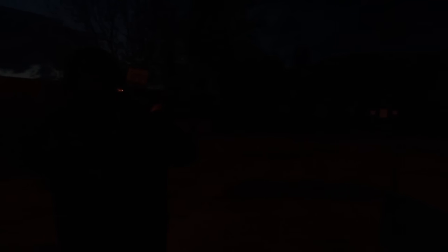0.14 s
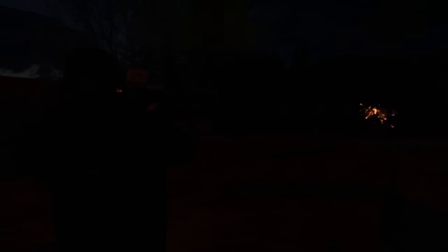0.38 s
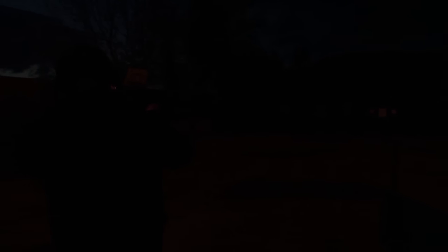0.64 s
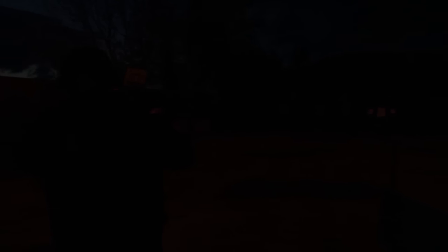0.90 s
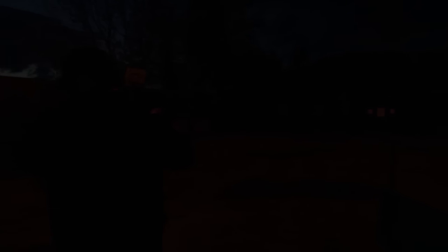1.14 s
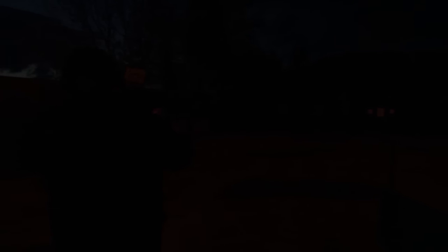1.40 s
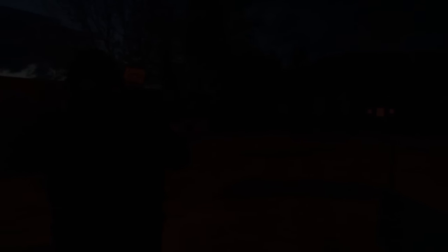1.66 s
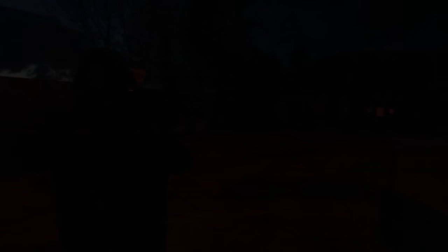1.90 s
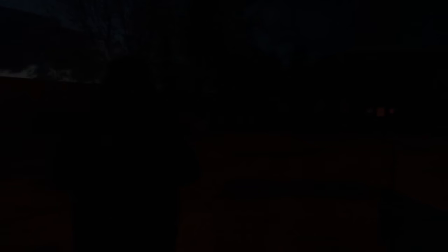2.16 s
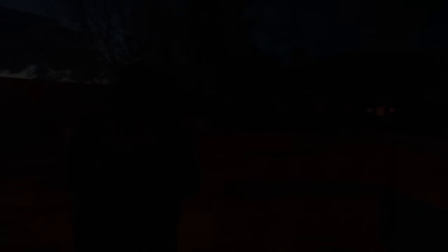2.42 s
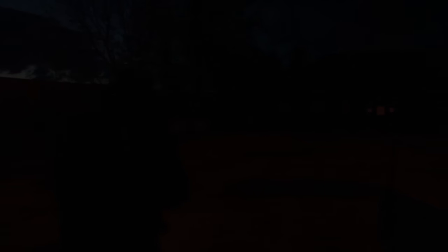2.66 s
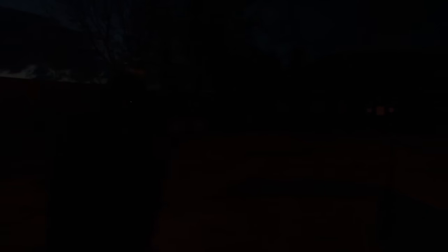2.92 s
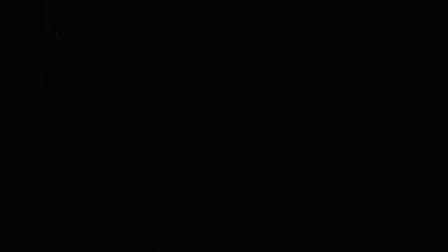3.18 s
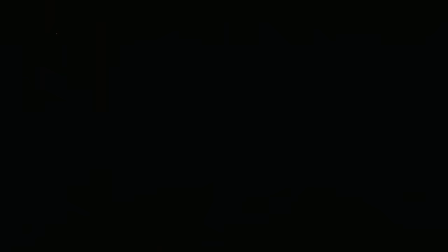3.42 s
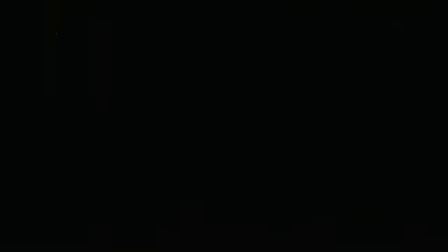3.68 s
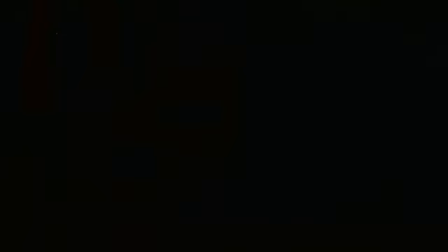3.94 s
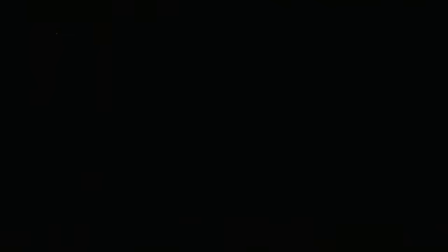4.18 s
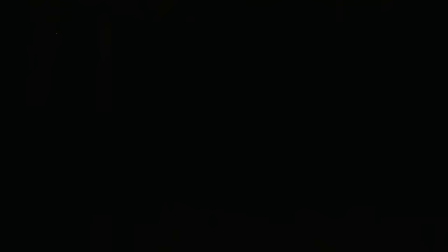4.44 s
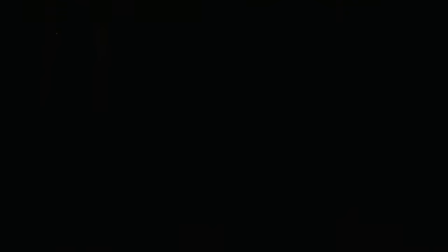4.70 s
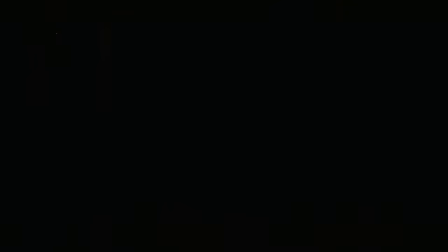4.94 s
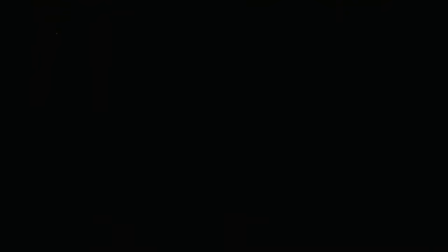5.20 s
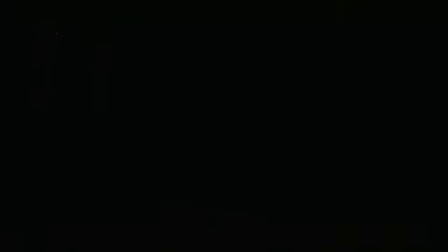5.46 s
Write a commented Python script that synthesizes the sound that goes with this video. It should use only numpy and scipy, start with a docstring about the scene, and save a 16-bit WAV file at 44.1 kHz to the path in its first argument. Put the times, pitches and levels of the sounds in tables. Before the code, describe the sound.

Two distorted rifle shots outdoors at night, each rolling back in echoes from trees and hills, with a brass case ringing and gear rattling between.

```python
"""Rifle shots on an outdoor range at night, in two joined stretches: decaying noise bursts on slow pushes
overload the microphone; shaped noise and strong slaps roll back from trees and hills, duller with travel.
Narrow noise bands resonate faintly in the roll. Brass cases click, knock the ground and ring as sines.
Gear ticks and rustles close by in noise puffs and grains, over hiss, wind rumble and a faint far hoot."""
import sys
import numpy as np
from scipy import signal
from scipy.fft import rfft, irfft, next_fast_len
from scipy.io import wavfile
from scipy.ndimage import uniform_filter1d, minimum_filter1d, map_coordinates

SR = 44100
rng = np.random.default_rng(int(sys.argv[2]) if len(sys.argv) > 2 else 0)


def gain_from_decibels(decibels):
    """Convert decibel values to linear amplitude factors."""
    exponent = np.asarray(decibels, float) / 20
    return 10 ** exponent


def to_wav(s):
    """Save 16-bit WAV."""
    ch = np.atleast_2d(s).T  # columns
    pcm = np.round(np.clip(ch, -1, 1) * 32767)  # PCM
    wavfile.write(sys.argv[1], SR, pcm.astype(np.int16))


N = 246059
T = np.arange(N) / SR
JOIN_S = 3.087  # the second stretch begins

# Steady background, one list a stretch. Each row: time in seconds, hiss in dB (10.5-14 kHz),
# rumble in dB (30-120 Hz, before its wobble).
FLOOR = [
    [(0, -68, -46), (1.2, -71.5, -41.5), (2.3, -63.5, -43), (3.085, -62, -48)],
    [(3.09, -85.5, -67), (4.3, -85, -59.5), (5.58, -77.5, -55)],
]
# Hiss spectrum. Each row: frequency in Hz, density in dB per Hz, before scaling.
HISS_SPECTRUM = [(150, 13.5), (500, 19), (1500, 7.5), (3000, 2.5), (8000, -0.5), (15000, -2)]
# Rumble spectrum. Each row: frequency in Hz, density in dB per Hz, before scaling.
RUMBLE_SPECTRUM = [(15, -19), (30, -3.5), (55, -4.5), (90, -7), (140, -11), (250, -31.5), (500, -89.5)]
# Faint far hoot. Each row: time in seconds, pitch in Hz, level in dB before its wobble.
HOOT = [(3.089, 547, -61), (3.16, 537, -61.5), (3.219, 527.7, -72), (3.37, 524, -61), (3.5, 526, -75.5),
        (3.56, 517, -87)]
# Cloth and straps, one row a movement. Each row: start in seconds, length in seconds,
# starting level in dB (6-14 kHz, before the swell), change in dB per second,
# scrape (2.3-4.7 kHz) over it in dB.
RUSTLE = [(1.43, 0.16, -50, -70, -10), (2.0, .2, -51, -1.2, 2), (2.36, .73, -58, 5.5, 1),
          (2.608, .05, -34.5, -290, -3), (2.631, 0.19, -47.5, -9.5, -2.7), (2.762, .052, -44, 120, 11.5),
          (2.968, .061, -25.5, -60, 1.5), (3.035, .05, -51, 92.5, 4.5)]
# Dry ticks of rolling brass and gear. Each row: start in seconds, level in dB before the band filter,
# centre in Hz.
TICKS = [(.272, -40.5, 7160), (1.335, -33.5, 9000), (1.923, -22, 4900), (1.939, -28, 8000),
         (2.0479, -31.5, 10100), (2.094, -26.5, 13600), (2.163, -19, 8800), (2.183, -22, 3760),
         (2.4515, -19, 2580), (2.616, -17, 10100), (2.787, -12.5, 3240), (2.807, -14, 2730),
         (2.965, -13.5, 3490), (2.971, -13.5, 9080), (2.979, -9, 5904), (2.988, -5.5, 4980),
         (3.005, -5.5, 6920), (3.076, -23, 3970), (5.005, -46.5, 11000), (5.227, -40, 8940),
         (5.552, -44.5, 7340)]
# Case contacts and ring swells; some rows are nearly all ring. Each row: time in seconds,
# click in dB before its filter, low ring in dB, high ring in dB (rings before the tumbling wobble).
CASE_SOUNDS = [(0.0, -70, -55, -55), (.1, -62, -56, -58), (1.4301, -1.5, -29.5, -21.5),
               (1.7379, -13.5, -45, -51), (1.752, -48, -42, -31), (1.866, -30.5, -53, -34.5),
               (1.959, -37, -51, -36.5), (5.079, -34, -44.5, -51), (5.572, -52, -63, -60)]
# Case rings, one list a kind of case. Each row: frequency in Hz, t60 in seconds, level changes per second.
CASE_RINGS = [
    [(9765, 0.4, 76), (14800, 0.203, 81)],
    [(10000, 0.15, 140), (14460, 0.22, 120)],
]
# Ground's knock under a case. Each row: frequency in Hz, resonance width in Hz (applied twice),
# gain in dB over the click's level.
GROUND_KNOCK = [(1500, 605, 28), (300, 340, 14)]
# Narrow resonances in the roll. Each row: start in seconds, frequency in Hz, resonance width in Hz
# (applied twice), level in dB before decay, t60 in seconds.
RESONANCES = [(.45, 2200, 119.2, -31, 2.3), (.45, 5454, 148, -32, 1.1), (4.03, 3656, 290, -18, .94),
              (4.03, 7570, 270, -25.5, 0.64)]
# Shots, the first before the start. Each row: travel counted from, in seconds, early bass lift in dB before
# its frequency weight, tilt in dB per octave, share (0-1) of the treble loss that strong reflections escape.
SHOTS = [(-1.5, 11.5, -3.5, .1), (0.45, 6, -0.56, 0.2), (4, 3.5, -3.5, .45)]
# Slopes, tree lines and hills that answer, one list a shot. Each row: loudest at in seconds,
# level in dB (0.5-2 kHz), swell in dB per second, fade in dB per second.
ANSWERS = [
    [(0.0041, -49.5, 900, 7)],
    [(.368, -29, 899, 30), (.424, -17, 898, 89.5), (.495, -20, 149.5, 62), (.52, -26.5, 198, 17),
     (.92, -27, 18.5, 39.5), (1.76, -30, 87, 32), (2.0, -38.5, 28.5, 52), (2.5, -52, 8, 4)],
    [(3.967, -3, 895.5, 69), (4.2, -17, 39.5, 58.5), (4.8, -51.5, 30, 21), (5.3, -50, 39, 21)],
]
# Single strong reflections. Each row: start in seconds, level in dB before colouring.
SLAPS = [(0.559, 1), (.657, 0.5), (0.741, 1.5), (.774, -7), (.842, -2), (.885, -2), (0.924, -4.5),
         (0.958, -3.5), (1.035, -21), (1.735, -6.5), (1.821, -30), (1.847, -14.5), (1.897, -8), (2.076, -6),
         (2.138, -13.5), (4.131, 3.5), (4.186, 7.5), (4.213, 12), (4.286, 3.5), (4.314, 1), (4.366, 2),
         (4.397, 1), (4.502, -10), (5.272, -28)]
# Colour of a fresh blast, before the shot's tilt. Each row: frequency in Hz, level in dB.
FRESH_COLOUR = [(500, -2), (1000, 0), (2000, -3), (4000, -5), (8000, -8.5), (16000, -10)]
# Loss in air. Each row: frequency in Hz, loss in dB per second of travel.
AIR_LOSS = [(1000, 6.78), (2000, 9.5), (3000, 15.8), (4000, 21.7), (5500, 31.4), (8000, 53.7), (11000, 90),
            (16000, 150)]
# Overloading bursts. Each row: start in seconds, starting level in dB, t60 in seconds, centre in Hz,
# width in Hz.
BURSTS = [(0.3649, -14.5, 0.25, 9120, 14000), (0.3716, -5, 0.12, 7660, 14000),
          (0.3694, -6, 0.036, 1094, 1500), (3.964, 8.5, 0.07, 2971, 6000), (3.981, 11, 0.29, 400, 880)]
# Slow pressure pushes: the muzzle blast's, then a long negative sag after the second shot. Each row: start in
# seconds, # signed size before shaping, time constant in seconds.
PUSHES = [(.4165, .8, .001), (.446, .6, .0015), (.494, .5, .002), (3.981, 6, .004), (4.02, -2.5, .03)]

FAINT_TICKS_PER_S, FAINT_MAX_DB = 12, -49
SWELL_SHARE, STOP_S = .25, .005  # of a movement's length; time a movement takes to stop
RIM_DELAY_S = .0015  # the rim lands after the base
SMEAR_S, SMEAR_PER_S = .0015, .0015  # tail of a strong reflection, growth per second of travel


def along(points, hz):
    """(Hz, value) points read on a log frequency axis."""
    f, v = np.transpose(points)
    return np.interp(np.log(hz + 1), np.log(f + 1), v)


def filtered(x, response):
    """x through a complex frequency response."""
    m = next_fast_len(len(x) + 8192)
    return irfft(rfft(x, m) * response(np.fft.rfftfreq(m, 1 / SR)), m)[:len(x)]


def peak(f, hz, width_hz):
    """Response of a causal resonance."""
    return 1j * f * width_hz / (hz * hz - f * f + 1j * f * width_hz)


def noise(count=N):
    """White noise, rms 1."""
    return rng.standard_normal(count)


def band_unit(x, lo_hz, hi_hz):
    """x scaled to rms 1 inside a band."""
    return x / np.std(filtered(x, lambda f: (f > lo_hz) & (f < hi_hz)))


def wobble(knots_per_s):
    """Smooth random curve through normal knots."""
    return map_coordinates(rng.standard_normal(int(N * knots_per_s / SR) + 4), [T * knots_per_s])


def gain(rows, column):
    """Gain curve of one dB column, silent outside its rows."""
    rows = np.array(rows)
    return gain_from_decibels(np.interp(T, rows[:, 0], rows[:, column], -200, -200))


def crackle(clicks_per_s, spread_db):
    """Random clicks of uneven size, rms 1."""
    signs = (rng.random(N) < clicks_per_s / SR) * rng.choice([-1, 1], N)
    x = signs * gain_from_decibels(spread_db * np.minimum(rng.exponential(size=N), 2.5))
    return x / np.std(x)


def add(track, start_s, x):
    """Lay x on the track in place."""
    part = track[round(start_s * SR):][:len(x)]
    part += x[:len(part)]


def background():
    """Microphone hiss with faint crackle, light wind rumble, and the hoot with its octave."""
    grainy = noise() + 0.23 * crackle(54, spread_db=1.5)
    hiss = band_unit(filtered(grainy, lambda f: gain_from_decibels(along(HISS_SPECTRUM, f))), 10500, 14000)
    rumble = band_unit(filtered(noise(), lambda f: gain_from_decibels(along(RUMBLE_SPECTRUM, f))), 30, 120)
    rumble = rumble * gain_from_decibels(2.5 * wobble(9))
    s, hz, _ = np.transpose(HOOT)
    phase = 2 * np.pi * np.cumsum(np.interp(T, s, hz)) / SR
    tone = np.sin(phase) + .11 * np.sin(2 * phase + 1.5 * wobble(30))
    hoot = gain(HOOT, column=2) * gain_from_decibels(4 * wobble(25)) * tone
    return hoot + sum(gain(rows, column=1) * hiss + gain(rows, column=2) * rumble for rows in FLOOR)


def rustle():
    """Cloth slips in quick separate snaps over a fine grain, with a scrape that rings near 3 kHz."""
    slips = signal.fftconvolve(np.abs(crackle(310, spread_db=-1)), np.exp(-T[:256] / 0.002))[:N]
    grains = crackle(5000, spread_db=2) + .6 * noise()
    grains = grains * (1.1 + slips / np.std(slips))
    bright = band_unit(filtered(grains, lambda f: peak(f, 8500, 11000)), 6000, 14000)
    scrape = filtered(grains, lambda f: peak(f, 2870, 2500) ** 2 + .5 * peak(f, 1000, 2000))
    scrape = band_unit(scrape, 2300, 4700)
    out = np.zeros(N)
    for s, length_s, db, db_per_s, scrape_db in RUSTLE:
        swell = (T - s) / (SWELL_SHARE * length_s)
        stop = (s + length_s - T) / STOP_S
        moving = np.clip(np.minimum(swell, stop), 0, 1) * (T < JOIN_S)
        level = gain_from_decibels(db + db_per_s * np.clip(T - s, 0, length_s))
        out += moving * level * (bright + gain_from_decibels(scrape_db) * scrape)
    return out


def ticks():
    """Short noise puffs, each around its own centre, and faint ones at random."""
    out, t = np.zeros(N), T[:1024]
    draws = rng.random((round(FAINT_TICKS_PER_S * N / SR), 3))
    faint = [(s * N / SR, FAINT_MAX_DB - 8 * a, 5000 + 7000 * b) for s, a, b in draws]
    # no faint ticks from the join until the last shot's travel count starts
    faint = [row for row in faint if not JOIN_S < row[0] < SHOTS[-1][0]]
    for s, db, hz in TICKS + faint:
        puff = noise(len(t)) * gain_from_decibels(-60 * t / .007)
        add(out, s, gain_from_decibels(db) * filtered(puff, lambda f: peak(f, hz, .7 * hz)))
    return out


def cases():
    """Rim clicks over a soft knock of the ground; tumbling brass rings decay, cut at the next row."""
    out, knocks, t = np.zeros(N), np.zeros(N), T[:SR // 2]
    ends = [row[0] for row in CASE_SOUNDS[1:]] + [N / SR]
    for (s, db, *ring_dbs), end in zip(CASE_SOUNDS, ends):
        click = noise(len(t)) * gain_from_decibels(db - 60 * t / 0.0058)
        click = filtered(click, lambda f: peak(f, 11000, 10000))
        ring = np.zeros(len(t))
        for ring_db, (hz, t60_s, changes_per_s) in zip(ring_dbs, CASE_RINGS[int(s > JOIN_S)]):
            tumble_db = 5.9 * wobble(changes_per_s)[:len(t)]
            ring += gain_from_decibels(ring_db + tumble_db - 60 * t / t60_s) * np.sin(2 * np.pi * hz * t)
        add(out, s + RIM_DELAY_S, click + ring * (t < end - s))
        add(knocks, s - .001, gain_from_decibels([db]))
    return out + filtered(knocks, lambda f: sum(gain_from_decibels(db) * peak(f, hz, width_hz) ** 2
                                                for hz, width_hz, db in GROUND_KNOCK))


def resonances():
    """Narrow resonances in the roll: noise bands that start with a shot and decay."""
    out = np.zeros(N)
    for s, hz, width_hz, db, t60_s in RESONANCES:
        t = np.clip(T - s, 0, None)
        narrow = filtered(noise(), lambda f: peak(f, hz, width_hz) ** 2)
        out += gain_from_decibels(db - 60 * t / t60_s) * (1 - np.exp(-t / .01)) * narrow / np.std(narrow)
    return out


def roll(rows):
    """Parts of the land swell and fade, powers adding, from the first answer to the stretch's end."""
    db = [level + np.minimum(swell * (T - s), fade * (s - T)) for s, level, swell, fade in rows]
    first_s = rows[0][0]
    same_stretch = (T < JOIN_S) == (first_s < JOIN_S)
    return np.sqrt(np.sum(gain_from_decibels(db) ** 2, axis=0)) * (T > first_s - .003) * same_stretch


def strong_reflections():
    """Each slap is a short 1.5 kHz wave and a noise tail that lengthens with travel time."""
    slaps, t = np.zeros(N), T[:512]
    wave = np.sin(2 * np.pi * 1500 * t) * np.exp(-t / 0.00039)
    for s, db in SLAPS:
        travel_s = s - max(row[0] for row in SHOTS if row[0] < s)
        tail = noise(len(t)) * np.exp(-t / (SMEAR_S + SMEAR_PER_S * travel_s))
        add(slaps, s, gain_from_decibels(db) * (wave / (1 + .6 * travel_s) + 0.5 * tail))
    return slaps


def echoes():
    """Countless reflections and a few strong ones, dulled by the air for their travel time."""
    slaps = strong_reflections()
    puff = noise(512) * np.exp(-T[:512] / 0.0013)
    clumps = signal.fftconvolve(crackle(140, spread_db=5), puff)[:N]
    dense = noise() + .7 * clumps / np.std(clumps)
    f, t, z = signal.stft(np.array([dense, slaps]), SR, nperseg=1024)
    band = (f > 500) & (f < 2000)
    air_db_per_s = along(AIR_LOSS, f)[:, None]
    bass_weight = along([(60, 1.5), (250, 1.23), (700, 0.045)], f)[:, None]
    out = np.zeros(N)
    for k, ((travel_from_s, bass_db, tilt_db, hard_share), rows) in enumerate(zip(SHOTS, ANSWERS)):
        travel_s = np.clip(t - travel_from_s, 0, 2.2)
        fresh_db = along(FRESH_COLOUR, f) + tilt_db * np.log2(1 + f / 1000)
        colour_db = fresh_db[:, None] - air_db_per_s * travel_s
        # trunks and leaves return little bass: it is gone once the near ground has answered
        colour_db += bass_weight * (bass_db - 17 * (1 - np.exp(-(travel_s / 0.29) ** 2)))
        colour = gain_from_decibels(colour_db)
        colour /= np.sqrt(np.mean(colour[band] ** 2, axis=0))
        # hard faces keep more treble than foliage
        shine = gain_from_decibels(hard_share * air_db_per_s * travel_s)
        coloured = z * [colour / np.sqrt(band.mean()), colour * shine]
        carpet, single = signal.istft(coloured, SR, nperseg=1024)[1][:, :N]
        out += roll(rows) * carpet * gain_from_decibels(1.2 * wobble(30))
        if k > 0:  # slaps belong to the shots after the start
            out += single * ((T < JOIN_S) == (travel_from_s < JOIN_S))
    return out


def blasts():
    """The bullet's crack and the muzzle blast: sudden noise that dies fast, riding on slow pushes."""
    out, t = np.zeros(N), T[:SR // 2]
    for s, db, t60_s, hz, width_hz in BURSTS:
        burst = filtered(noise(len(t)), lambda f: peak(f, hz, width_hz))
        add(out, s, gain_from_decibels(db - 60 * t / t60_s) * burst / np.std(burst))
    for s, size, length_s in PUSHES:
        onset = 1 - np.exp(-t / 0.00052)
        add(out, s, size * (1 - t / length_s) * np.exp(-t / length_s) * onset)
    return out


def scene():
    """Everything at one microphone."""
    return (background() + rustle() + ticks() + cases() + resonances() + echoes() + blasts())[None]


def roll_off(x):
    """The treble ends steeply here."""
    return signal.sosfilt(signal.butter(12, 15790, fs=SR, output="sos"), x)


def record(dry):
    """Input clips, gain control ducks under sustained overload, a wind filter cuts the first stretch's bass."""
    clip_level, keep = .97, np.exp(-1 / (.003 * SR))
    x = dry[0] / (1 + np.abs(dry[0] / clip_level) ** 8) ** (1 / 8)
    power = signal.lfilter([1 - keep], [1, -keep], x ** 2)
    held = -minimum_filter1d(-power, size=5001, origin=2500)  # running maximum
    x = x / np.sqrt(1 + (uniform_filter1d(held, size=101) / .55) ** 2)
    first = filtered(x * (T < JOIN_S), lambda f: (1j * f / (85 + 1j * f)) ** 4)
    second = filtered(x * (T >= JOIN_S), lambda f: 1j * f / (12 + 1j * f))
    # treble ends in a 400 Hz slope
    mix = filtered(first + second, lambda f: np.clip((15950 - f) / 400, 0, 1))
    return roll_off(mix[None])


dry = scene()
out = record(dry)
to_wav(out)
```